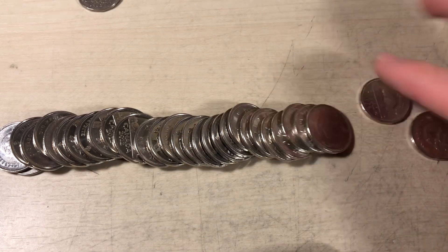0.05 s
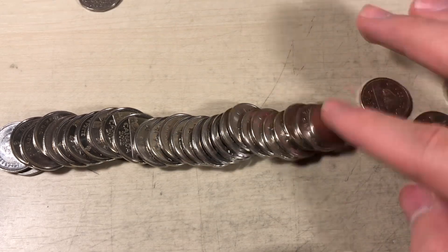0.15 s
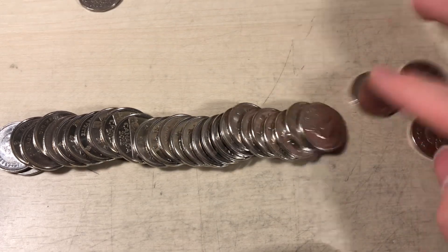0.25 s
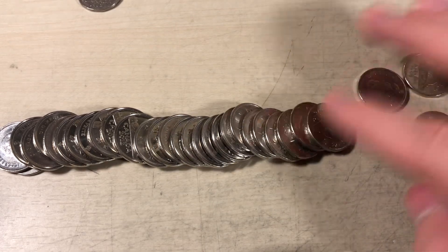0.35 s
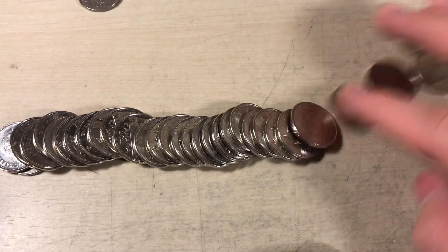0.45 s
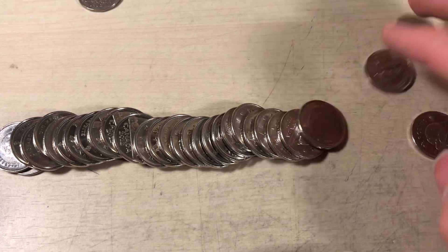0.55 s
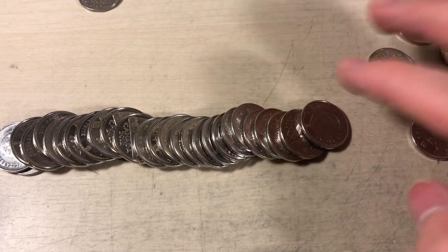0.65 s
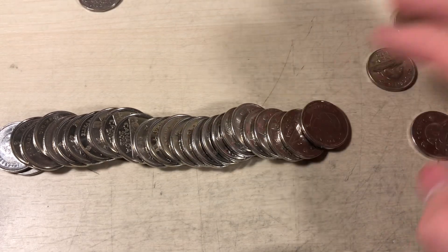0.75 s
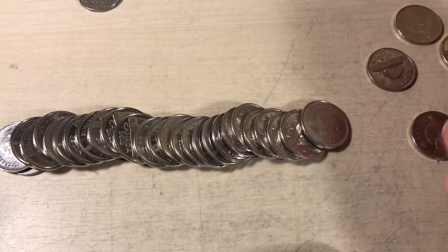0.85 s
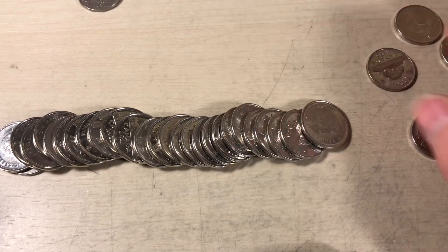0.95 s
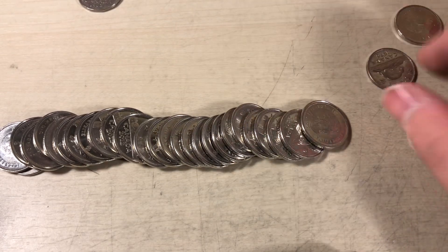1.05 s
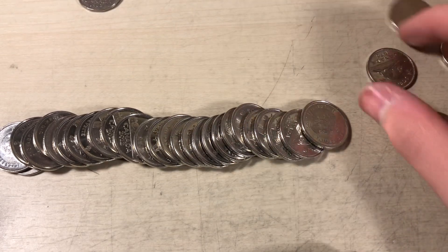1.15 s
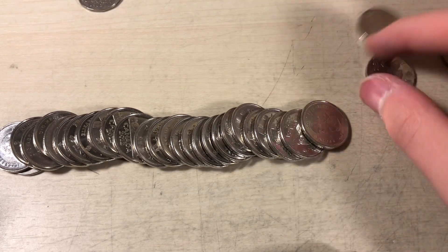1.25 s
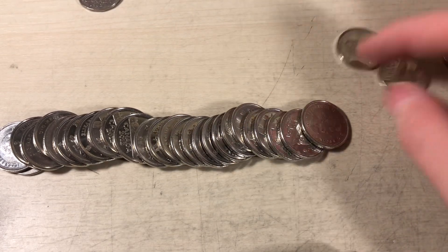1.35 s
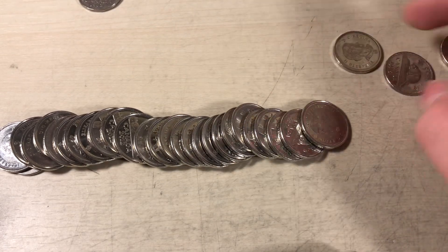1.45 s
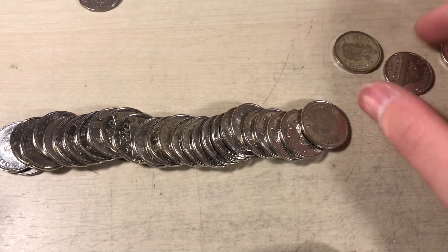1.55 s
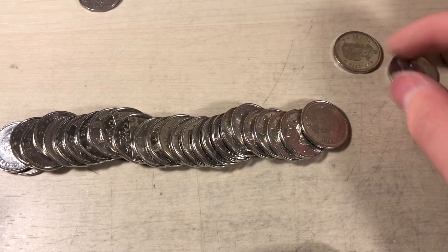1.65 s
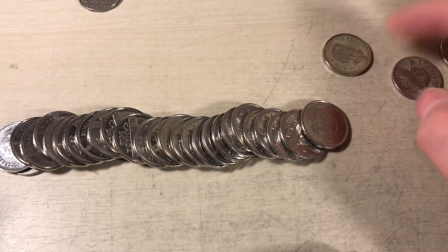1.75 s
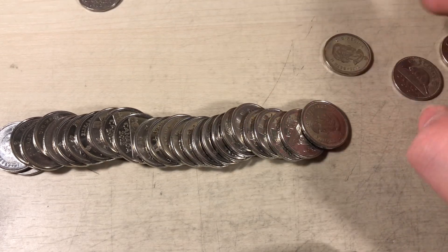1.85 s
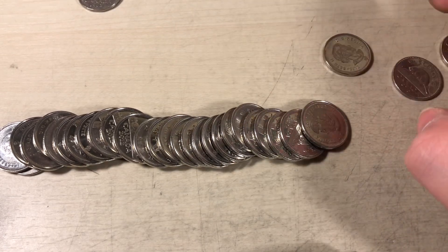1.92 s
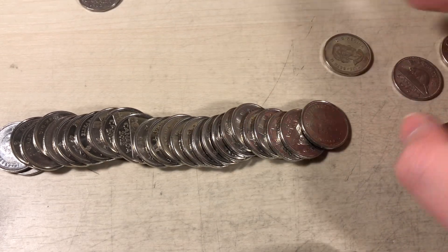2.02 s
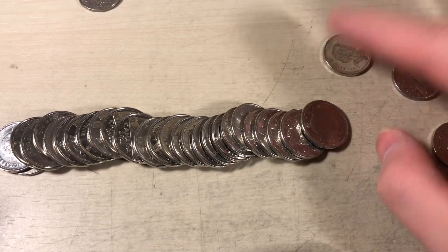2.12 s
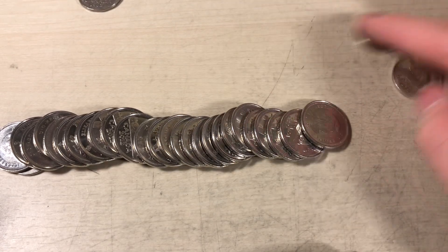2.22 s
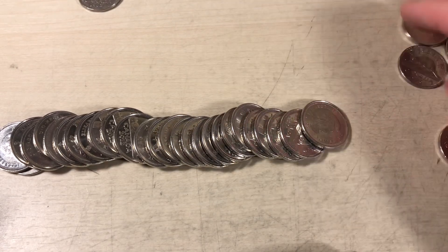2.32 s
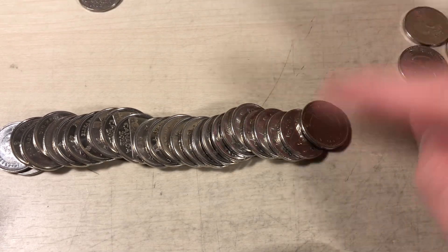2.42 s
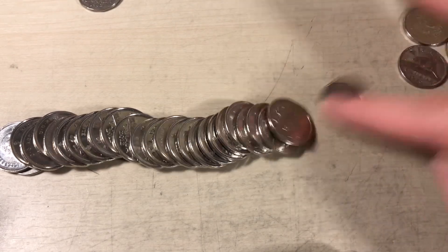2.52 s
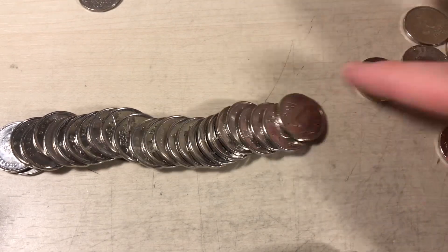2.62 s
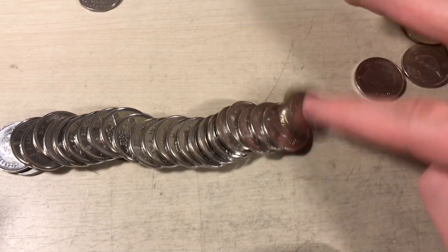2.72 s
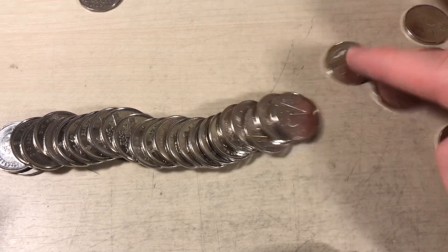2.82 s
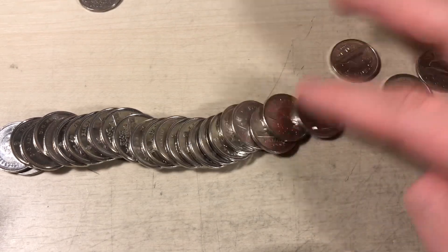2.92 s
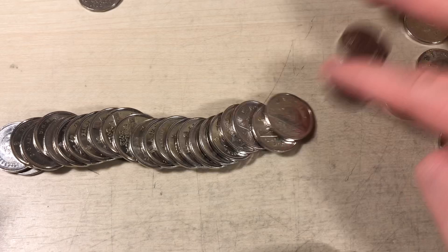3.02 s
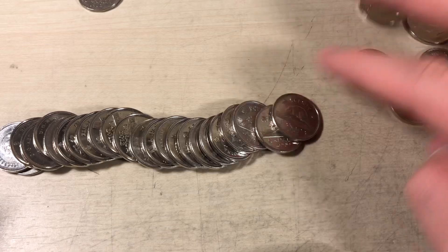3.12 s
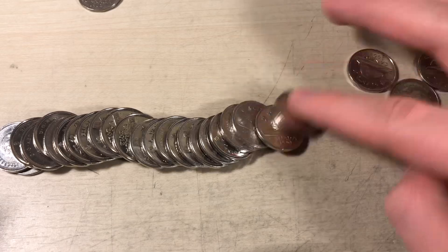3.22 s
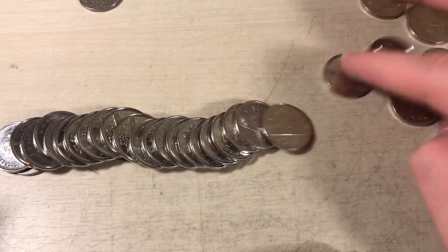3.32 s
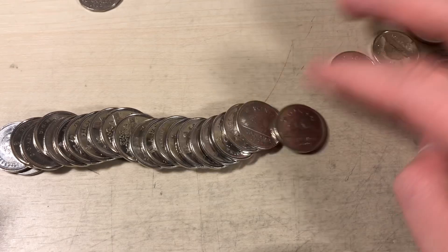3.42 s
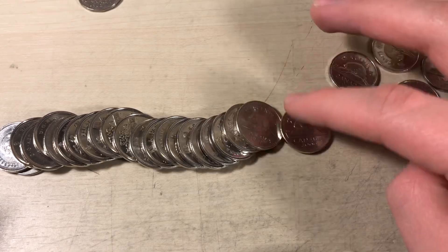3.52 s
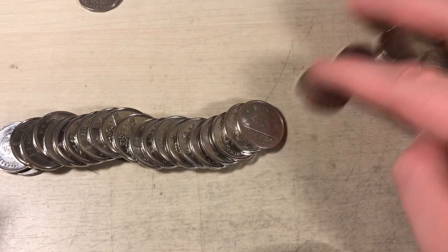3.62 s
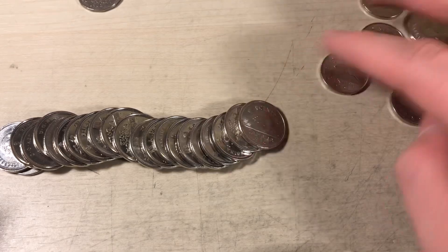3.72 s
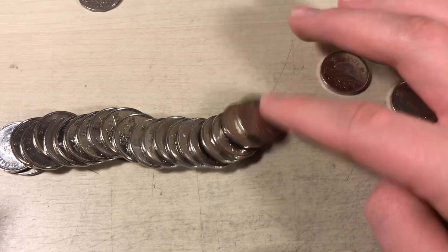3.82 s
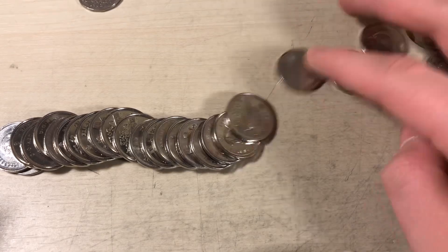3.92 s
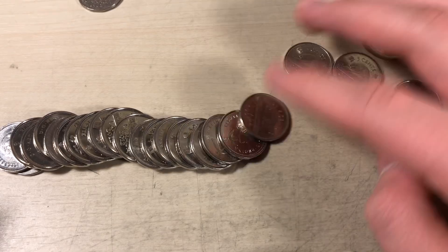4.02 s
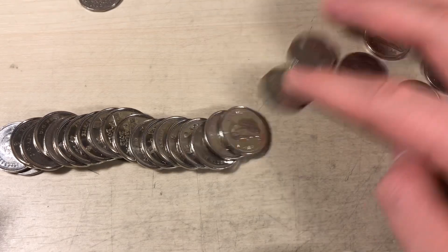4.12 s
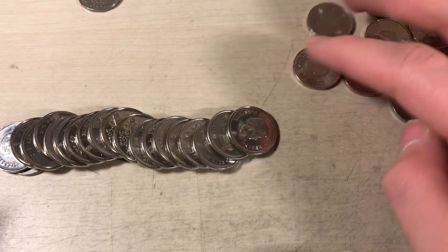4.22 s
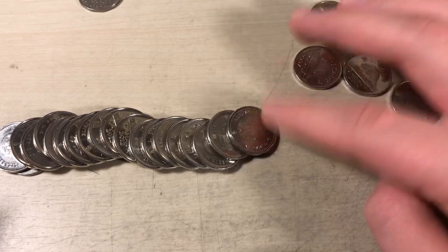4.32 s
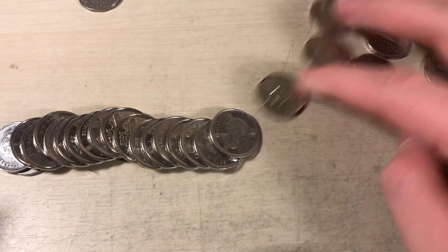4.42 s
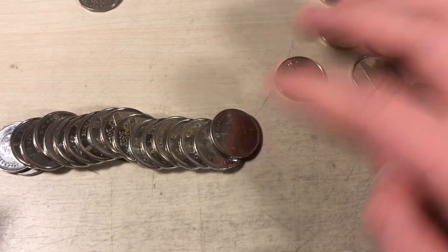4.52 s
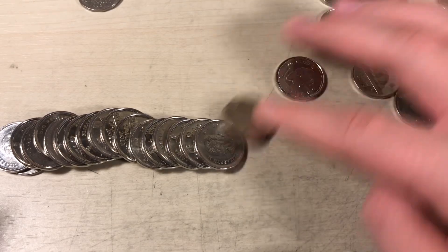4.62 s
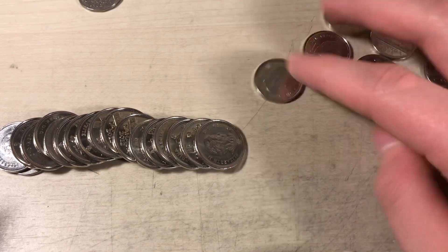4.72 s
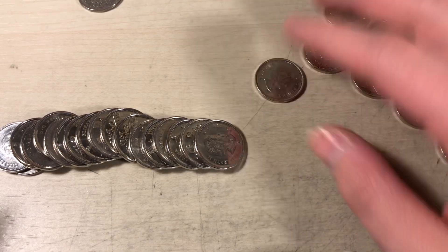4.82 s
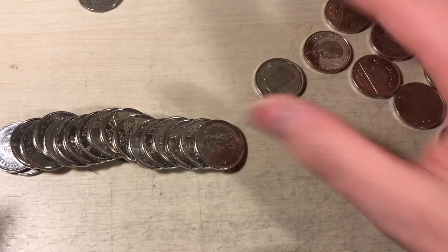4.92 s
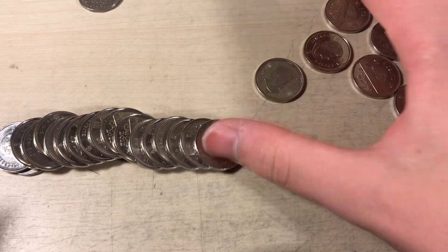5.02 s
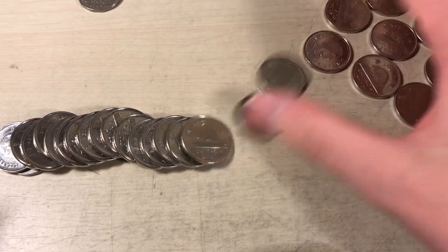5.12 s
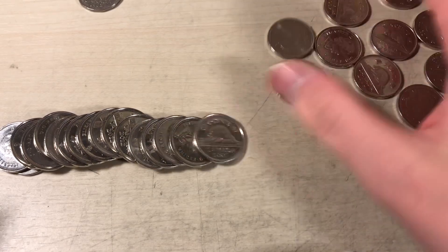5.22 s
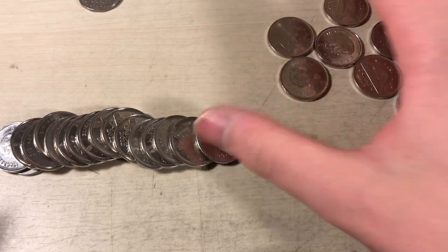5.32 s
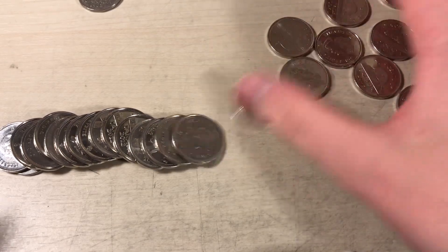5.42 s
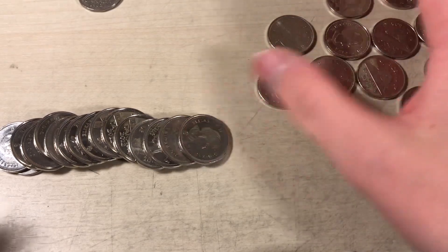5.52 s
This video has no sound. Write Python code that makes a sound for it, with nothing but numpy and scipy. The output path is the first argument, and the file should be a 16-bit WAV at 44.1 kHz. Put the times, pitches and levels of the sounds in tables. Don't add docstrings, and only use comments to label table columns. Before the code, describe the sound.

Three quick flicks knock coins off a leaning row onto a wooden table, each a short scrape, a sharp clack and a rattle. A quieter gap follows, with soft fingertip thumps and faint sliding. Then flicks resume steadily, with bright clinks and low table knocks, to the end. Close phone microphone, small room, short tail, faint low hiss.

```python
import sys
import numpy as np
from scipy import signal
from scipy.fft import rfft, irfft, next_fast_len
from scipy.io import wavfile
from scipy.ndimage import uniform_filter1d

SR = 44100
rng = np.random.default_rng(int(sys.argv[2]) if len(sys.argv) > 2 else 0)


def inscribe(sig):
    pcm = np.round(np.clip(np.atleast_2d(sig).T, -1, 1) * 32767)
    wavfile.write(sys.argv[1], SR, pcm.astype(np.int16))


def nominal_scale(level):
    x = np.asarray(level, float) / 20
    return 10 ** x


N = 245195


def unit(x):
    return x / np.sqrt(np.mean(x ** 2) + 1e-20)


def along(points, hz):
    f, v = np.transpose(points)
    return np.interp(np.log(hz + 1), np.log(f + 1), v)


def filtered(x, response):
    m = next_fast_len(N + SR // 2)
    return irfft(rfft(x, m) * response(np.fft.rfftfreq(m, 1 / SR)), m)[:N]


def body(x, modes):
    def response(f):
        h = 0
        for k, (centre, width, db) in enumerate(modes):
            mode = 1j * f * width / (centre * centre - f * f + 1j * f * width)
            h = h + (-1) ** k * nominal_scale(db) * mode
        return unit(np.abs(h)) * np.exp(1j * np.angle(h))
    return filtered(x, response)


def many(x, modes):
    turn = rng.integers(0, 6, N // (SR // 50) + 1).repeat(SR // 50)[:N]
    hz, width, db = np.transpose(modes)
    out = np.zeros(N)
    for k, (detune, tilt) in enumerate(rng.standard_normal((6, 2, len(modes)))):
        variant = np.transpose([hz * (1 + 0.028 * detune), width, db + 3 * tilt])
        out += body(x * (turn == k), variant)
    return out


def grit(spread_db, clump_s):
    jumps = unit(uniform_filter1d(rng.standard_normal(N), max(1, round(clump_s * SR))))
    noise = rng.standard_normal(N) * nominal_scale(spread_db * jumps)
    return noise * nominal_scale(-spread_db ** 2 * np.log(10) / 20)


def shifting(x, depth_db):
    z = signal.stft(x, nperseg=512)[2]
    field = uniform_filter1d(rng.standard_normal(z.shape), size=3, axis=0)
    field = uniform_filter1d(field, size=10, axis=1)
    return signal.istft(z * nominal_scale(depth_db * unit(field)), nperseg=512)[1][:N]


def ticks(rate, spread_db, t60):
    hits = (rng.random(N) < rate / SR) * nominal_scale(spread_db * rng.exponential(size=N).clip(0, 3))
    decay = nominal_scale(-60 * np.arange(SR // 100) / SR / t60)
    return unit(rng.standard_normal(N) * signal.fftconvolve(hits, decay)[:N])


def blows(rows, level_db, t60, push=False):
    t = np.arange(SR // 25) / SR
    rows = np.array(rows)
    heft = np.clip(2 + rows[:, 1:2] / 28, 0.5, 2)
    snap = nominal_scale(-60 * t / (0.28 * t60 * heft))
    shiver = nominal_scale(-4.5 - 60 * t / (1.6 * t60 * heft))
    burst = rng.standard_normal((len(rows), len(t))) * (snap + shiver)
    if push:
        burst = np.sign(burst[:, :1]) * (t == 0)
    burst /= np.linalg.norm(burst, axis=1)[:, None]
    at = np.round(rows[:, :1] * SR).astype(int) + np.arange(len(t))
    return np.bincount(at.ravel(), (nominal_scale(level_db)[:, None] * burst).ravel(), N + SR)[:N]


def ringing(rows, t60, rise_s):
    out, t = np.zeros(N + SR), np.arange(SR // 2) / SR
    for s, hz, db in rows:
        envelope = nominal_scale(db - 60 * t / t60) * (1 - np.exp(-t / rise_s))
        out[round(s * SR):][:len(t)] += envelope * np.sin(2 * np.pi * hz * t)
    return out[:N]


# frequency in Hz, density in dB per Hz.
HISS = [(12, -40), (20, -13), (48, -6.5), (70, -8.5), (91, -10.5), (123, -8.5), (198, -16), (422, -18),
        (1120, -28.5), (14700, -41.5), (16000, -46)]


def hiss():
    return nominal_scale(-67.5) * unit(filtered(rng.standard_normal(N), lambda hz: nominal_scale(along(HISS, hz))))


def stroke(start, stop, level_db, sag_db, rise, fall):
    t = np.arange(0, N, 16) / SR
    after = np.maximum(t - stop, 0)
    held = level_db - sag_db * np.clip((t - start) / (stop - start), 0, 1)
    return held - rise * np.maximum(start - t, 0) - (fall + 340 * (t - stop)) * after


# finger meets coin in seconds, full rub in seconds, coin lets go in seconds,
# scrape level in dB, fade in dB per second.
FLICKS = [(-0.02, 0.018, 0.085, -33.5, 323.5), (0.248, 0.274, 0.34, -34.5, 360.5),
          (0.488, 0.532, 0.59, -31, 280.5), (2.5615, 2.5645, 2.62, -32, 259.5),
          (2.814, 2.846, 2.83, -29, 101), (2.995, 3.085, 3.025, -17.5, 493), (3.3, 3.318, 3.39, -35.5, 253),
          (3.642, 3.669, 3.554, -17.5, 150), (3.911, 3.93, 3.995, -34.5, 268),
          (4.172, 4.179, 4.2056, -29.5, 286), (4.431, 4.461, 4.527, -35.5, 322),
          (4.679, 4.72, 4.775, -38.5, 249.5), (5.138, 5.198, 5.22, -29.5, 258),
          (5.446, 5.48, 5.47, -32.5, 131)]
# extra rim chatter in dB, extra rumble in dB.
LEAN = [(-3.5, 4.4), (0.5, 2.5), (-4, -3), (2, 5), (1.5, 4.5), (-4.5, 5), (-3, 3.3), (3.5, -10), (-1.5, 6),
        (0, 0), (-18, 0.5), (-15, -5), (-2, 1), (1.5, 4.5)]
# start in seconds, stop in seconds, scrape level in dB,
# sag in dB, rim chatter level in dB.
PUSHES = [
    (1.236, 1.373, -49, -6, -83),
    (1.344, 1.518, -49.5, -1, -87),
    (1.708, 1.807, -52, 0, -71),
    (2.28, 2.347, -37.5, -2, -62.5),
    (2.379, 2.423, -40.5, 17, -55.5),
    (3.11, 3.243, -42, 10.5, -74.5),
    (3.472, 3.64, -61, 16.5, -62.5),
    (3.724, 3.794, -41.5, 0.5, -69),
    (3.79, 3.852, -48, 10.5, -82),
]
# from in seconds, to in seconds.
SPOTS = [
    (1.1, 1.395),
    (1.395, 1.62),
    (1.62, 2.0),
    (2.0, 2.5),
]


def motion():
    rest_db, build_db = -77.5, 1
    loud_db = -32

    def flicks(gain_db, rises, fades):
        strokes = []
        for (meet, full, go, db, fade), gain in zip(FLICKS, gain_db):
            rise = rises * (db - rest_db) / (full - meet)
            strokes.append(stroke(full, go, db + gain - build_db, -build_db, rise, fades * fade))
        return strokes

    def pushes(level_db, sag_db):
        return [stroke(start, stop, db, sag, rise=710, fall=490)
                for (start, stop, *_), db, sag in zip(PUSHES, level_db, sag_db)]

    start, _, scrape_db, sag_db, edge_db = np.transpose(PUSHES)
    rim_lean, top_lean = np.transpose(LEAN)
    wood = flicks(0 * rim_lean, 0.91, 0.81) + pushes(scrape_db, sag_db)
    rim = flicks(-34.5 - loud_db + rim_lean, 0.55, 1.8) + pushes(edge_db, sag_db)
    shake_db = -53 + 6 * (start > SPOTS[-1][1])
    top = flicks(-37.5 - loud_db + top_lean, 0.68, 0.63) + pushes(shake_db, 8 + 0 * start)
    levels = [np.max(layer, axis=0).repeat(16)[:N] for layer in (wood, rim, top)]
    return np.maximum(levels, -140)


def lone():
    t = np.arange(N) / SR
    return (t > SPOTS[0][0]) & (t < SPOTS[-1][1])


# frequency in Hz, width in Hz, level in dB.
FLAT = [
    [(1285, 50, -1.5), (1800, 120, -12), (2330, 80, -0.5), (2670, 70, -5), (3140, 170, 3), (3720, 120, -13),
     (4550, 270, 1)],
    [(1290, 150, 2.5), (1910, 140, 2), (2300, 90, 3), (2960, 200, -3), (3670, 260, 4), (4000, 130, 3),
     (4460, 260, 1)],
    [(1320, 58, 5), (1857, 240, 0.5), (2340, 90, 2), (2780, 100, -5.5), (3240, 84, 3.5), (3500, 170, -6),
     (4520, 240, 1)],
    [(1268, 55, 1.5), (1860, 270, -0.5), (2160, 62, 5), (2620, 250, -7), (3660, 280, 4), (4470, 240, 4),
     (5950, 130, -0.5)],
]
# frequency in Hz, width in Hz, level in dB.
AIRY = [(2870, 2200, -8.5), (5200, 910, -12.5), (6510, 1300, -17)]


def dragging(level_db):
    t = np.arange(N) / SR
    grain = nominal_scale(level_db) * shifting(grit(spread_db=1.5, clump_s=0.003), depth_db=1.2)
    scrape = sum(body(grain * (t > a) * (t <= b), modes + AIRY) for (a, b), modes in zip(SPOTS, FLAT))
    dull_hz = 7530
    return filtered(scrape, lambda hz: (dull_hz / (dull_hz + 1j * hz)) ** 2)


# frequency in Hz, width in Hz, level in dB.
WOOD = [(969, 110, -5), (1273, 84, -1.5), (1511, 79, 0.5), (1749, 90, -2.5), (2012, 170, 2),
        (2518, 216, -1.5), (2730, 120, 1), (3105, 400, 0), (3147, 130, 3.5), (3742, 230, -6.5),
        (4470, 200, 0), (4900, 54, -6), (5656, 67, -7.5), (3900, 2300, -7)]


def wood_scrape(wood_db):
    grain = nominal_scale(wood_db) * shifting(grit(spread_db=2.5, clump_s=0.0022), depth_db=2.0)
    return many(grain * ~lone(), WOOD) + dragging(wood_db)


# frequency in Hz, width in Hz, level in dB.
TOP = [(183, 78.6, 6), (219, 64.6, 12), (308, 83, 6), (417, 40, 5.5), (532, 84, 2), (684, 27, 0),
       (837, 520, -9)]
# frequency in Hz, width in Hz, level in dB.
PAD = [(194, 22, 2.5), (283, 106, -3.5), (387, 70, -5)]


def table_rumble(top_db):
    shake = nominal_scale(top_db) * shifting(grit(spread_db=3, clump_s=0.012), depth_db=2.5)
    alone = lone()
    return body(shake * ~alone, TOP) + body(shake * alone, PAD + [(700, 400, -12.5)])


# frequency in Hz, width in Hz, level in dB.
METAL = [(4955, 3600, -3.5), (6760, 1700, 1), (7606, 1300, 1.5), (8800, 3200, 1.5), (9820, 1600, -3.5)]
# frequency in Hz, width in Hz, level in dB.
RIM = [(9500, 11000, -7.5), (11680, 230, 2.5), (12600, 600, -2.5), (13500, 3200, 1.5), (13300, 1600, -7.5),
       (17500, 1400, -9)]
# frequency in Hz, width in Hz, level in dB.
RING = [(15500, 150, -8), (15615, 100, -5), (15690, 85, 0)]


def rim_chatter(rim_db, wood_db):
    force = np.clip((rim_db + 77.5) / 35, 0.3, 1)
    tiny = (rim_db < wood_db) * ticks(rate=350, spread_db=1.0, t60=0.012)
    faces = shifting(grit(4 * force, clump_s=0.0014), depth_db=6.5) + 0.15 * tiny
    faces = nominal_scale(rim_db - 5.5) * faces
    edge_db = rim_db + 0.11 * (rim_db + 37.0) + 0.3 * np.minimum(rim_db - wood_db + 4.0, 0)
    edge = shifting(grit(4 * force, clump_s=0.0015), depth_db=3.5) + 0.8 * tiny
    edge = nominal_scale(edge_db) * edge
    return many(faces, METAL) + nominal_scale(-4.0) * many(edge, RIM) + nominal_scale(-7.0) * body(edge, RING)


def sliding():
    wood_db, rim_db, top_db = motion()
    return wood_scrape(wood_db) + table_rumble(top_db) + rim_chatter(rim_db, wood_db)


# time in seconds, metal clack in dB, then relative to it
# rim tick in dB, wood tap in dB, table knock in dB.
SLAPS = [(0.088, -12.5, -10, -5, -22), (0.3273, -11.5, -16, -4, -31), (0.3346, -24.5, -13, -4, -1),
         (0.571, -14.5, -12, -6, -16.5), (0.576, -18.5, -18, -21.5, -15.5), (2.564, -20.5, 12, 6, -22),
         (2.593, -27, -13, -6, -21.5), (2.6125, -11.5, -30.5, -2.5, -16), (2.8588, -17, 8, 5.5, -3.5),
         (2.9011, -25.5, 15, 6.5, -0.5), (3.0806, -27, 9.5, 4.5, -23), (3.0989, -13.5, 3.5, 1.5, -15),
         (3.3655, -16.5, -21, -4, -29), (3.3716, -14.5, -20, -9, -10), (3.6833, -9.5, -13, -8, -15.5),
         (3.9868, -20, -13, -0.5, -16), (4.21, -25, 11, 5, 2), (4.2185, -20, -9, -7, -7),
         (4.512, -22, 4.5, 5, -6.5), (4.7543, -13, -10.5, -16, -14), (5.2075, -17.5, -12, -11.5, -20.5),
         (5.2203, -11, -15, -11, -17), (5.2253, -19.5, -10, -2, -5.5), (5.5023, -9, -16, -20, -23),
         (5.5065, -13, -19, -5, -13.5), (2.8635, -22.5, -3.5, 8.5, -7.5), (5.5298, -20.5, -4, -4, -9)]
# time in seconds, metal clack in dB, brightness (rim over wood) in dB.
NUDGES = [(0.0146, -33, 6.5), (0.2472, -35.5, 0.5), (0.2639, -37, 7), (0.493, -44, 2.5),
          (0.5231, -47.5, -0.5), (2.8194, -42, -3), (3.0502, -47, 8), (3.0564, -42.5, 17.5),
          (3.3081, -33.5, 3), (3.677, -41, -22), (3.9082, -40, -4), (3.9149, -36, 5), (4.1807, -28.5, 5),
          (4.435, -49.5, -2), (4.4497, -35.5, -9.5), (5.1287, -38, 4.5), (5.1581, -45.5, 14),
          (5.4767, -50, 5)]
# time in seconds, clack
# in dB, brightness in dB.
JOSTLES = [(0.034, -36.5, -5), (0.0514, -30, -12), (0.3439, -31.5, 6), (0.59, -29, 8), (1.3085, -76, -69),
           (1.352, -78, -62), (2.6371, -33, 26), (2.651, -30.5, -4), (2.9239, -31, 12), (2.9282, -29, 12),
           (3.073, -29.5, 4), (3.3316, -27, 6), (3.3879, -26.5, 7.5), (3.7081, -32, 2), (3.7184, -39.5, -3),
           (3.9369, -26, 6), (4.0132, -29, 2), (4.0445, -31.5, -0.5), (4.1968, -30.5, 7), (4.468, -33.5, 7),
           (4.482, -37, 16), (4.529, -41, -3), (4.7806, -37.5, 22), (5.1444, -52, 14), (5.241, -26.5, 9),
           (5.545, -31.5, 4)]
# time in seconds, clack in dB, brightness in dB.
SETTLES = [(0.3803, -39, 6.5), (0.4029, -45, 2), (1.402, -47, 5), (2.354, -36, -6.5), (2.364, -41.5, -1.5),
           (2.406, -48, 2), (2.432, -48, 6.5), (2.6922, -43, 6.5), (3.0015, -50, 7), (3.192, -51.5, -14),
           (3.236, -61.5, -29), (3.4192, -41.5, 15), (3.4468, -35.5, -4), (3.5052, -44, -4),
           (3.5292, -36.5, -2), (3.5534, -38.5, -6), (3.572, -43.5, -1.5), (3.5846, -45.5, -13),
           (3.6043, -46, -9.5), (3.6336, -54, -7), (3.6497, -50, -21), (3.7423, -45.5, -13),
           (3.7713, -40, 1), (3.781, -37.5, 7), (3.787, -50.5, 13), (0.0075, -50.5, 6.5),
           (0.6402, -50.5, 7.5), (4.078, -43.5, 4), (4.249, -43, 19.5), (4.596, -56, 2.5),
           (4.8158, -42.5, -2), (5.355, -59, 0.5)]
# time in seconds, clack in dB, brightness in dB.
STRAYS = [(0.067, -37, 11.5), (0.114, -41.5, -1), (0.317, -35.5, 15), (0.5599, -25.5, 0), (0.6165, -41, 11),
          (2.282, -49, -21), (2.835, -34.5, 14), (3.429, -46, 10), (3.698, -35, 13.5), (4.7275, -37, 8.5),
          (5.4897, -31, -5), (0.665, -50.5, -17), (0.143, -64, 13.5), (0.185, -69.5, 7), (0.298, -29, 0.5),
          (0.505, -56.5, 16), (0.632, -43, 8.5), (1.677, -56, -15), (2.541, -63.5, 6.5), (2.668, -47.5, 11),
          (2.706, -61, 12.5), (2.716, -63, 7), (2.772, -64.5, 10.5), (2.964, -44.5, 12.5),
          (2.976, -48, 11.5), (3.1205, -36, 14), (3.147, -47, 12.5), (3.5085, -48, -5), (3.533, -44.5, 2),
          (3.563, -51.5, 3.5), (5.5226, -41, 15), (5.238, -31, 3), (3.611, -55, -12.5), (3.735, -45, 14),
          (3.751, -60, 2.5), (4.07, -49, 3.5), (4.09, -53, 11), (2.6056, -25.5, 3.5), (4.1, -59, 8),
          (4.329, -62.5, -0.5), (4.62, -71.5, 9.5), ]
# time in seconds, clack in dB, brightness in dB.
CHATTER = [(0.0354, -31.5, 7.5), (0.049, -29, 9.5), (0.122, -49.5, 6.5), (0.2922, -34, 3.5),
           (0.3602, -38.5, 13), (0.3874, -47, -2), (0.394, -48, 0), (0.526, -39, 3), (0.5503, -33.5, 3.5),
           (0.602, -34, 8.5), (1.4084, -50, -2), (2.5936, -31, -11), (2.8446, -44, 13), (2.8767, -33.5, 13),
           (2.8843, -34.5, 7.5), (2.936, -39.5, 7), (2.9481, -39.5, 18), (2.9845, -54.5, 1),
           (2.994, -52.5, 14), (3.022, -53.5, 5.5), (3.032, -58, -2), (3.1103, -37, 9), (3.124, -40.5, 6.5),
           (3.1427, -46, -1), (3.1767, -57, 3), (3.3142, -35, 5.5), (3.348, -26, 3), (3.3591, -33.5, -1.5),
           (3.3663, -23.5, 1), (3.4166, -43.5, 5.5), (3.4236, -47.5, 2.5), (3.434, -52.5, 8),
           (3.439, -53.5, 9), (3.453, -49.5, 2), (3.4683, -53.5, 1)]
# time in seconds, clack in dB, brightness in dB.
RATTLE = [(3.5921, -54, 4), (3.6703, -45, 2.5), (3.713, -36, 5.5), (3.716, -34, 15), (3.725, -31.5, 5),
          (3.732, -42.5, 14), (3.7393, -42, 2.5), (3.761, -51, -13), (3.9226, -49.5, 8.5),
          (3.931, -36, 4.0), (3.9523, -29, 14.5), (4.002, -36.5, 8), (4.03, -36.5, -4), (4.037, -50.5, 6.5),
          (4.2229, -25, 5), (4.2427, -35, 8.5), (4.2949, -59, -16), (4.4497, -27.5, 12),
          (4.4662, -38.5, 6.5), (4.493, -30, 7), (4.7209, -42.5, 5.5), (4.7347, -43.5, 17.5),
          (4.776, -33.5, 16.5), (5.1743, -34.5, -8), (5.1798, -36, -1), (5.1861, -35, -1), (5.2035, -24, 4),
          (5.222, -24, 5), (5.2475, -33.5, 12), (5.4493, -52, -11), (5.464, -61, 4), (5.4895, -29, 8),
          (5.4956, -38, 10)]
# rim and wood in dB, table knock in dB.
LIGHT = [
    (6, 0.5),
    (3.5, -1),
    (3.5, -1),
    (3.5, -5.5),
    (5.5, -8),
    (0.5, -15.5),
]


def all_contacts():
    light = []
    for rows, (over, knock) in zip([NUDGES, JOSTLES, SETTLES, STRAYS, CHATTER, RATTLE], LIGHT):
        for s, db, bright in rows:
            light.append((s, db, over + bright / 2, over - bright / 2, knock))
    return SLAPS + light


# time in seconds, level in dB.
FREE = [(0.344, -15.5), (0.0164, -31.5), (0.033, -27.5), (0.099, -31), (0.107, -37.5), (0.564, -24.5),
        (0.5727, -24), (2.6035, -27.5), (2.638, -23), (3.317, -34.5), (3.697, -36), (3.741, -38.5),
        (3.977, -30), (4.045, -35.5), (4.4645, -34.5), (5.205, -28.5), (3.5298, -39.5), (0.605, -25.5),
        (3.937, -27.5), (1.4035, -47), (2.6151, -25.5), (2.9013, -18), (2.929, -24), (3.387, -24),
        (3.708, -24.5), (4.01, -30), (4.1953, -29.5), (4.2176, -17.5), (4.7808, -23.5), (5.2196, -28),
        (5.2485, -20.5), (5.5307, -32), (5.544, -25.5), (2.876, -23.5), (0.049, -22)]


def contacts():
    hits = all_contacts()
    s, db, rim_db, wood_db, top_db = np.transpose(hits)
    top_db = top_db - 8 * ((s > SPOTS[0][0]) & (s < SPOTS[-1][1]))
    clack = many(blows(hits, db + 19.5, t60=0.012), METAL)
    tick = many(blows(hits, db + rim_db + 16.5, t60=0.026), RIM)
    tap = many(blows(hits, db + wood_db + 18.5, t60=0.026), WOOD)
    knock = body(blows(hits, db + top_db + 21.5, t60=1, push=True), TOP)
    held = blows(hits, db - 16.5 + 22, t60=0.005)
    free = blows(FREE, np.transpose(FREE)[1] + 22, t60=1, push=True)
    return clack + tick + tap + knock + body(held + free, RING)


# time in seconds, frequency in Hz, level in dB.
THUDS = [(0.014, 534, -31), (0.014, 264, -35), (0.049, 538, -35), (0.089, 251, -30.5), (0.247, 520, -33.5),
         (0.328, 249, -28.5), (0.572, 286, -28.5), (2.599, 533.5, -31.5), (2.859, 240, -34.5),
         (2.9, 528.5, -34), (3.098, 310.6, -31.5), (3.684, 205, -28), (3.097, 531, -26.5),
         (3.31, 560, -34.5), (3.367, 196, -26), (3.446, 521, -36), (3.553, 560, -37), (3.915, 538, -30),
         (3.95, 483, -28), (3.99, 510, -31.5), (4.03, 521, -34), (4.24, 520, -38), (4.47, 511, -32.5),
         (4.181, 546, -32), (4.211, 234, -34), (4.512, 196.4, -29.5), (5.222, 239, -29)]


def thuds():
    return ringing(THUDS, t60=0.12, rise_s=0.003)


# time in seconds, wood-side frequency in Hz, metal-side frequency in Hz, level in dB.
CLINKS = [(0.087, 3660, 8100, -24), (0.3268, 4600, 5920, -24.5), (0.571, 1953, 5500, -28),
          (2.563, 2717, 11400, -21), (2.6125, 3744, 7970, -11.5), (2.8588, 4396, 1945, -16),
          (3.0989, 3740, 2380, -20), (3.3655, 3770, 8100, -22), (3.372, 3820, 4330, -20),
          (3.6833, 3510, 8230, -16.5), (4.21, 4390, 12340, -22), (4.512, 2500, 3450, -32),
          (4.7543, 3824, 5200, -21), (5.2207, 6440, 7540, -17.5), (5.2255, 3870, 5000, -21),
          (5.503, 6540, 8680, -15), (5.5065, 5260, 6560, -12)]


def clinks():
    wood_side = [(s, hz, db) for s, hz, _, db in CLINKS]
    metal_side = [(s, hz, db - 5) for s, _, hz, db in CLINKS]
    return ringing(wood_side + metal_side, t60=0.034, rise_s=0.0004)


# time in seconds, frequency in Hz, level in dB.
HUMS = [
    (0.088, 3068, -61),
    (2.6125, 3582, -55),
    (3.0989, 3582, -59),
    (3.6833, 3582, -58),
    (4.21, 3585, -64),
]


def hums():
    flutter = nominal_scale(4 * unit(uniform_filter1d(rng.standard_normal(N), size=SR // 60)))
    return flutter * ringing(HUMS, t60=0.6, rise_s=0.004)


# middle in seconds, half length in seconds, level in dB.
BRUSHES = [
    (1.263, 0.12, -68),
    (2.53, 0.071, -74),
    (5.023, 0.085, -62),
]
# frequency in Hz, density in dB per Hz.
SKIN = [(880, -40.5), (1500, -9.5), (3120, -9), (3520, -5), (5330, -3), (5770, -1), (16000, -17)]


def skin():
    t = np.arange(N) / SR
    level_db = np.max([db - 8 * ((t - s) / half) ** 4 for s, half, db in BRUSHES], axis=0)
    rustle = grit(spread_db=1.5, clump_s=0.002)
    return nominal_scale(level_db) * unit(filtered(rustle, lambda hz: nominal_scale(along(SKIN, hz))))


# time in seconds, level in dB.
TOUCH = [
    (1.23, -12),
    (1.678, -5),
    (2.22, -27),
    (2.33, -11),
]


def fingertip():
    return body(blows(TOUCH, np.transpose(TOUCH)[1], t60=1, push=True), PAD)


# frequency in Hz, t60 in seconds.
ROOM = [(200, 0.15), (600, 0.31), (2000, 0.25), (6000, 0.077), (12000, 0.065), (16000, 0.12)]


def room(x):
    out, size = np.zeros(N + SR), SR // 5
    for start in range(0, N, size):
        hz, t, z = signal.stft(rng.standard_normal(SR // 3), SR, nperseg=256)
        decay = nominal_scale(-60 * t / along(ROOM, hz)[:, None])
        tail = signal.istft(z * decay, SR, nperseg=256)[1]
        wet = signal.fftconvolve(x[start:start + size], tail / np.linalg.norm(tail))
        out[start + SR // 300:][:len(wet)] += wet
    return out[:N]


# delay in seconds, gain as a plain factor.
NEAR = [
    (0.00095, -0.13),
    (0.00116, 0.1),
    (0.0016, 0.13),
]


def scene():
    coins = contacts() + sliding() + fingertip() + skin() + clinks() + hums() + thuds()
    coins = filtered(coins, lambda hz: (1j * hz / (135 + 1j * hz)) ** 2)
    coins = filtered(coins, lambda hz: 1 + sum(g * np.exp(-2j * np.pi * hz * s) for s, g in NEAR))
    tail = nominal_scale(-14) * room(coins)
    return (coins + tail + hiss())[None]


def top_cut(x):
    return signal.sosfilt(signal.butter(12, 17000, fs=SR, output="sos"), x)


# frequency in Hz, gain in dB.
EDGE = [(25, -20), (40, 0), (15850, 0), (16050, -26), (16600, -30), (17000, -60)]


def record(dry):
    ceiling = 0.82
    rounded = dry[0] / (1 + (dry[0] / ceiling) ** 4) ** 0.18
    heard = filtered(rounded, lambda hz: nominal_scale(along(EDGE, hz)))
    return top_cut(heard[None])


dry = scene()
out = record(dry)
inscribe(out)
```